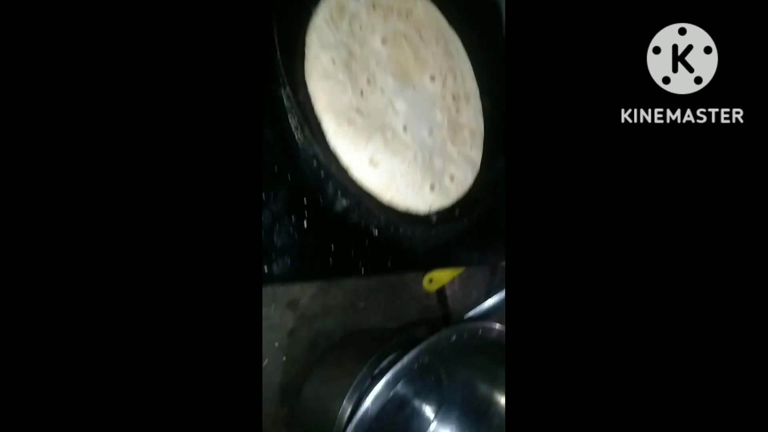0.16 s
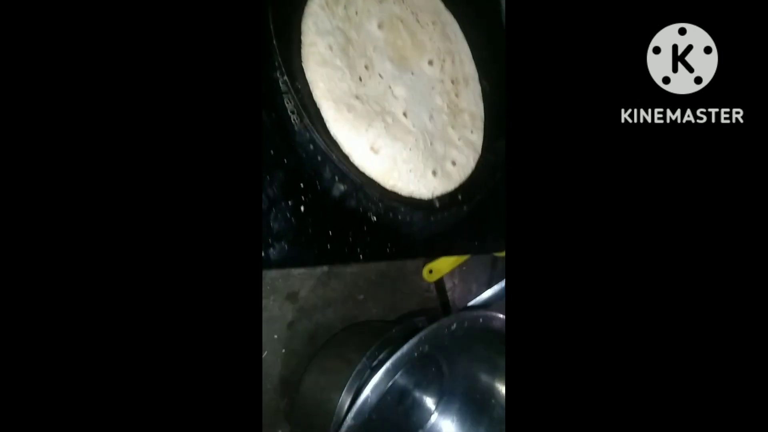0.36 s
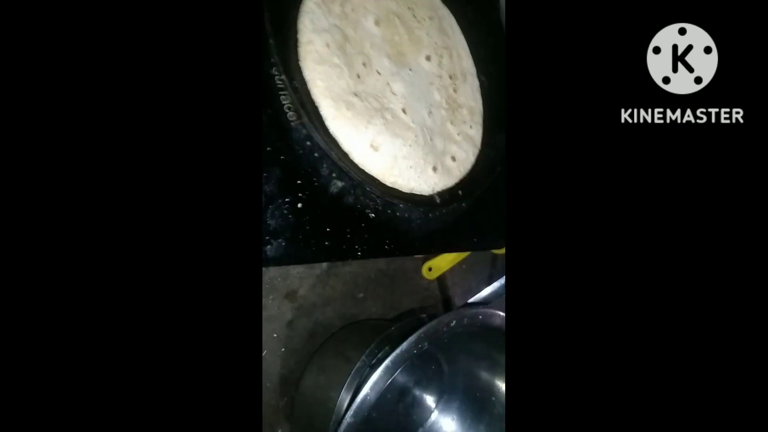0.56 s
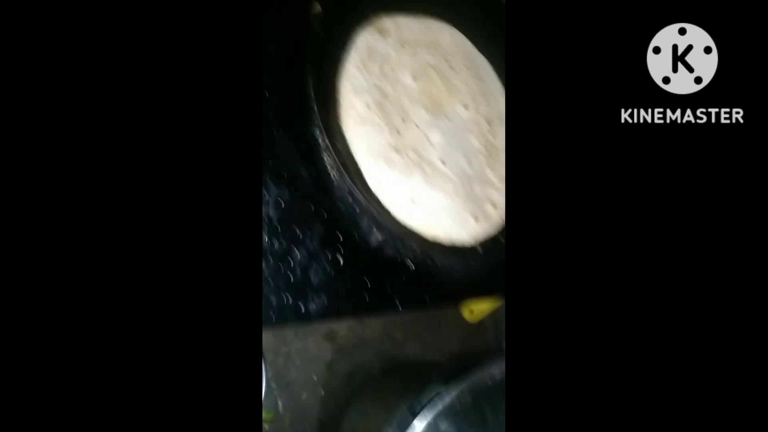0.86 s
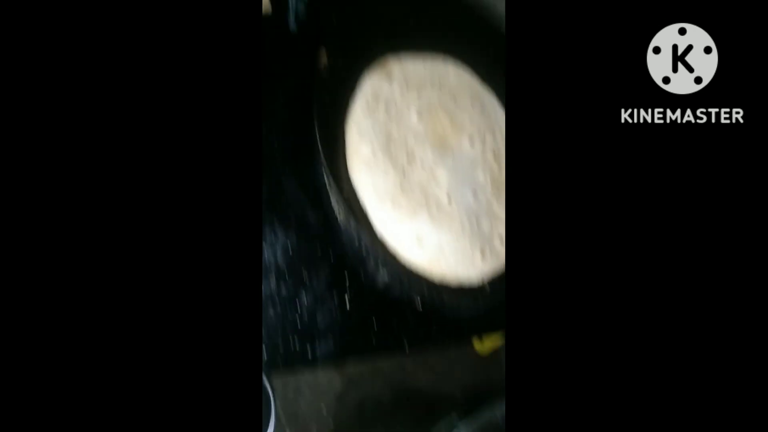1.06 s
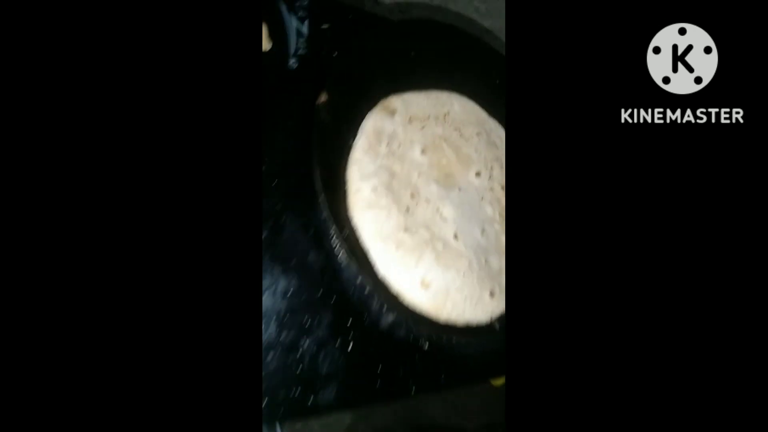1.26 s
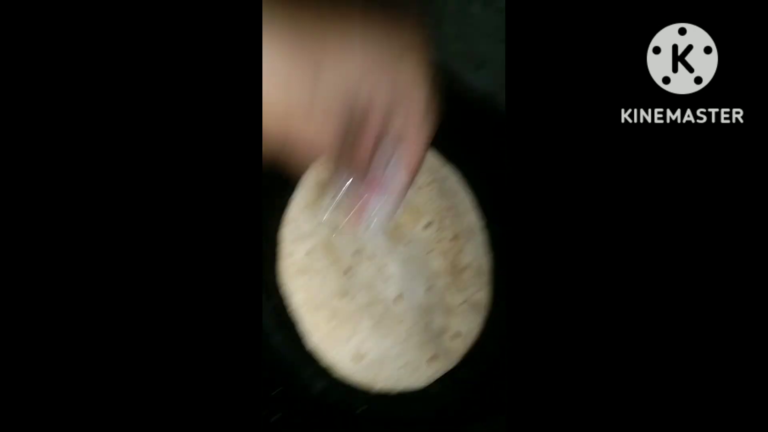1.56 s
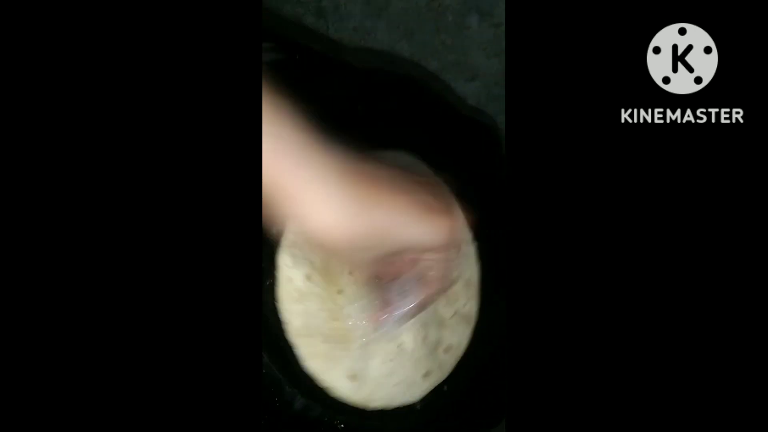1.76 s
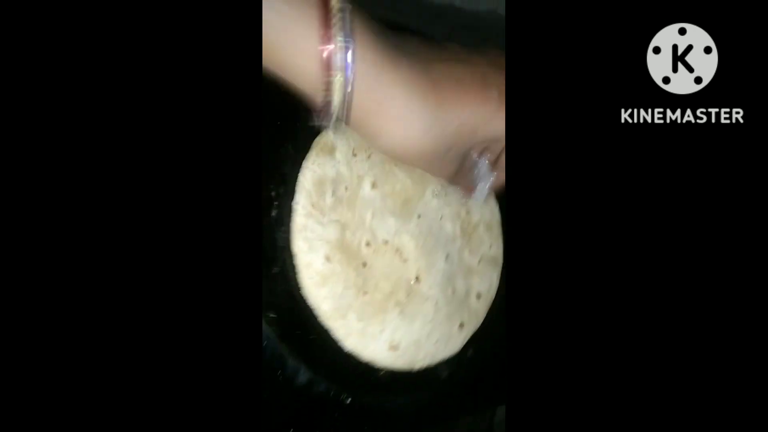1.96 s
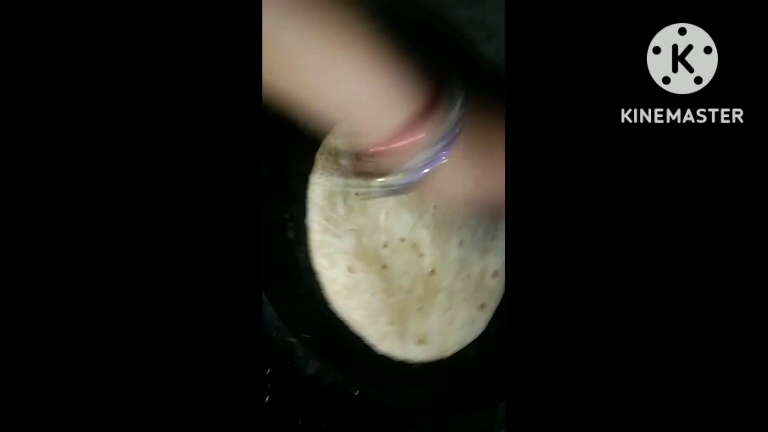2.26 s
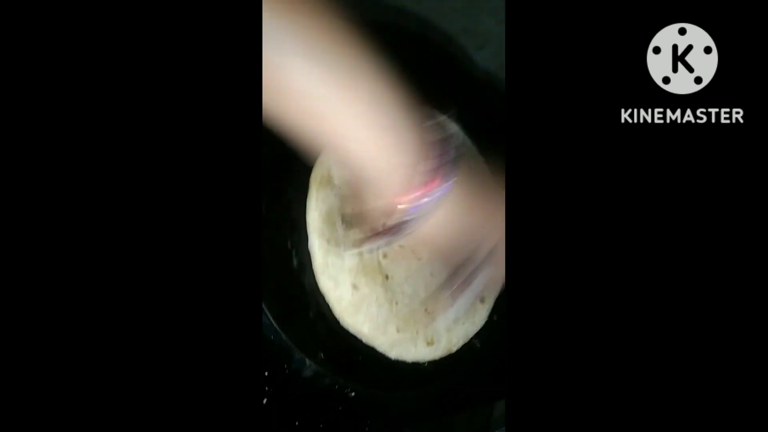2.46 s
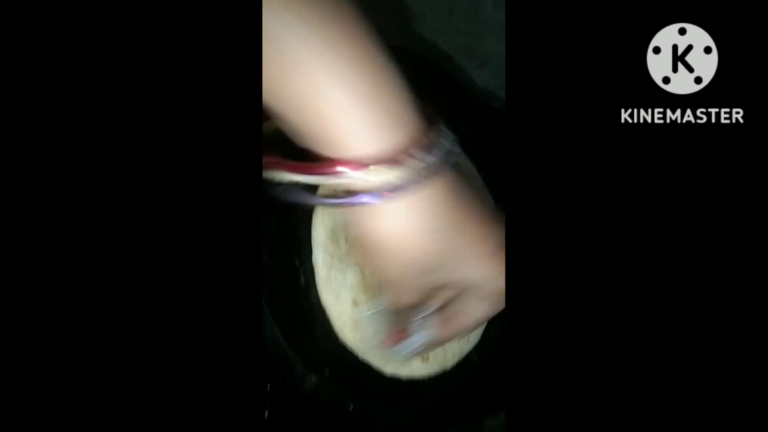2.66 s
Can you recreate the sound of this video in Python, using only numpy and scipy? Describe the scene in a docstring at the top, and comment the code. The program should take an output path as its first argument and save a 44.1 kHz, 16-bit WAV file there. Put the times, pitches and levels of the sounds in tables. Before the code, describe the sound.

Thin bangles jingle close to the microphone in a small hard-walled kitchen; first a bright cluster of clinks, then softer ones among hissing wipes of oil on flatbread, dry ticks, low booms and faint bubbling.

```python
"""Faint kitchen air, a thin fluttering trill and soft bubbling open, then bangles clink on a wrist, close to the microphone.
A hand wipes oil over flatbread on a hot griddle, among dry ticks, low booms and two faint whistles, one short and one long;
hard walls ring around it. Bangles are sums of decaying, unsteady partials; wipes are hissing and crackling noise with a
resonant rub. Bubbles are short sine blips; booms, ticks, trill, whistles and air are shaped noise."""
import sys
import numpy as np
from scipy import signal
from scipy.fft import rfft, irfft, next_fast_len
from scipy.io import wavfile
from scipy.ndimage import uniform_filter1d, map_coordinates

SR = 44100
rng = np.random.default_rng(int(sys.argv[2]) if len(sys.argv) > 2 else 0)


def unload_audio(sound):
    """Save the sound as a 16-bit wav file, at the path given as the first command line argument."""
    columns = np.transpose(np.atleast_2d(sound))
    # keep every value between -1 and 1, then stretch to whole-number steps
    steps = np.round(np.clip(columns, -1, 1) * 32767)
    wavfile.write(sys.argv[1], SR, steps.astype(np.int16))


N = 123479  # samples, 2.8 s


def undb(db):
    """Decibels to an amplitude factor."""
    return 10 ** (np.asarray(db) / 20)


def unit(x):
    """Scale to rms 1."""
    return x / np.sqrt(np.mean(x ** 2) + 1e-30)


def since(start):
    """Seconds since a moment, zero before it."""
    return np.maximum(np.arange(N) / SR - start, 0)


def walk(rate):
    """Random steps, rate per second, smoothed twice and scaled to rms 1."""
    k = max(int(SR / rate), 2)
    steps = np.repeat(rng.standard_normal(N // k + 1), k)
    smooth = uniform_filter1d(uniform_filter1d(steps, k), k)
    return unit(smooth[:N])


def colour(x, points, tilt=0):
    """Give a sound a spectrum of (Hz, dB) points, tilted by dB per octave, at rms 1."""
    size = next_fast_len(N, True)
    octave = np.log2(np.fft.rfftfreq(size, 1 / SR) + 1)
    hz, db = np.array(points).T
    gain = undb(np.interp(octave, np.log2(hz), db) + tilt * octave)
    return unit(irfft(rfft(x, size) * gain, size)[:N])


def band(hz, width):
    """Noise through one resonance, at rms 1."""
    size = next_fast_len(N)
    f = np.fft.rfftfreq(size, 1 / SR)
    resonance = 1 / (1 + ((f - hz) / (width / 2)) ** 2 / 2) ** 2
    return unit(irfft(rfft(rng.standard_normal(size)) * resonance, size)[:N])


def swell(start, rise, hold, fall):
    """Rise, hold, then a fall in dB per second."""
    attack = np.minimum(since(start) / max(rise, 1e-3), 1) ** 1.42
    return attack * undb(-fall * since(start + rise + hold))


def pops(rate, spread_db):
    """Random one-sample impulses of either sign and uneven size, rate per second."""
    hits = rng.random(N) < rate / SR
    sign = rng.choice([-1, 1], N)
    return hits * sign * undb(spread_db * np.minimum(rng.exponential(size=N), 4))


def room(x, wet_db):
    """Add the dense tail of the kitchen walls: decaying noise after a short gap."""
    gap_s, t60_s = 0.0026, 0.24
    t = since(gap_s)[:SR]
    tail = rng.standard_normal(SR) * (t > 0) * undb(-60 * t / t60_s)
    tail = tail / np.sqrt(np.sum(tail ** 2))
    return x + undb(wet_db) * signal.fftconvolve(x, tail)[:N]


def kitchen_air():
    """Broad room noise whose level wavers."""
    # Spectrum of the air. Each row: Hz, dB per Hz.
    air_colour = [(20, -45), (50, -38), (75, -4.5), (190, 2.5), (260, -3), (700, -10), (930, -7),
                  (2500, -13.5), (3600, -24.5), (8500, -26.5), (12000, -8.5), (15500, -18.5)]
    return undb(-61) * colour(rng.standard_normal(N), air_colour) * undb(1.8 * walk(14))


def spitting():
    """Fine spitting of the griddle: sparse impulses, mostly treble."""
    spit_colour = [(3000, -30), (8500, -16), (12000, 0), (15500, -2)]  # Hz, dB per Hz
    return undb(-71) * colour(pops(82, 3), spit_colour)


def simmering():
    """Resonances of the smaller bubbles, as noise bands of wavering level."""
    # Each row: centre in Hz, width in Hz, level in dB before the wavering.
    simmer_bands = [(936, 203, -67.5), (1580, 320, -80.5)]
    return sum(band(hz, width) * undb(db + 2 * walk(20)) for hz, width, db in simmer_bands)


def trill():
    """A thin high trill: narrow noise bands that flutter quickly under a slower change of level."""
    # Each row: centre in Hz, width in Hz, level in dB before the flutter and the slower change.
    trill_bands = [(6774, 270, -64), (7050, 100, -65.5)]
    # Slower change of level. Each row: time in seconds, gain in dB.
    trill_level = [(0, 4), (.6, -2), (.98, -2), (1.081, 3), (1.15, -2), (1.55, 4), (1.72, -4.5)]
    flutter_db, flutter_per_s = 5, 55
    thin = sum(band(hz, width) * undb(db + flutter_db * walk(flutter_per_s)) for hz, width, db in trill_bands)
    return thin * undb(np.interp(np.arange(N) / SR, *np.array(trill_level).T))


def booms():
    """Low booms of noise, levelled over short stretches, that swell and die away."""
    # Each row: start in seconds, level in dB, fall in dB per second.
    boom_times = [(-.03, -56, 143), (.955, -67.5, 160), (1.22, -37, 97), (1.33, -51, 22.5),
                  (1.929, -42.5, 33), (2.0, -53.5, 51)]
    # Spectrum before the levelling. Each row: Hz, dB per Hz.
    boom_colour = [(20, -25), (50, -16.5), (64, -10), (76, 4.5), (92, -5), (120, -10), (190, -14.5),
                   (260, -45), (600, -62)]
    rise_s, hold_s, end_s = 0.021, 0.014, 2.37
    rumble = colour(rng.standard_normal(N), boom_colour)
    rumble = rumble / np.sqrt(uniform_filter1d(rumble ** 2, size=2500))
    level = sum(undb(db) * swell(start, rise_s, hold_s, fall) for start, db, fall in boom_times)
    return rumble * level * undb(-200 * since(end_s))  # what is left drops away quickly


def rattle():
    """Unsteady strength and phase of a partial while the bangles chafe against each other."""
    smoothing = int(SR / 180)  # samples
    shake = uniform_filter1d(rng.standard_normal((2, SR // 2)), size=smoothing)
    shake = uniform_filter1d(shake, size=40)
    return unit(shake[0]) + 1j * unit(shake[1])


def ringing(which, t, low_db, high_db, ring):
    """The partials of one bangle, weighted by where it is struck and unsteady from chafing."""
    # Partials of the four bangles. Each row: the frequencies of one bangle in Hz.
    partial_hz = [
        [4332, 5280, 6890, 8285, 9445, 15170],
        [4888, 4960, 6745, 8226, 10243, 13225],
        [5100, 5160, 6015, 7125, 9830, 9897, 11409, 13310],
        [3758, 4600, 5276, 5739, 6557, 6966, 8651, 9345],
    ]
    # How they ring, one row per bangle. Each pair: level in dB, free ring time t60 in seconds.
    partial_modes = [
        [(-31, 0.31), (-25.5, 0.2), (-47, 0.31), (-20.5, 0.15), (0.5, 0.16), (-4.5, 0.12)],
        [(-27.5, 0.38), (-20, 0.16), (-38, 0.31), (-18, 0.2), (2.5, 0.13), (-2.5, .06)],
        [(-27.5, .35), (-25, 0.32), (-27, 0.099), (-42, 0.46), (-3, 0.19), (-5.5, 0.2), (-10, 0.061),
         (3.5, 0.056)],
        [(-17, 0.25), (-2, 0.23), (-8, 0.17), (-15.5, 0.18), (-4.5, 0.21), (-3, 0.12), (-14, 0.28),
         (-9.5, 0.17)],
    ]
    rattle_share, detune_hz = 0.53, 11.6  # detune_hz is the spread of the random detuning
    out, shake = 0, rattle()
    for hz, (mode_db, t60) in zip(partial_hz[which], partial_modes[which]):
        place_db = low_db * (hz < 9000) + high_db * (hz > 12000)
        gain = undb(mode_db + place_db - 60 * t / (t60 * max(ring, .1)))
        cycles = (hz + detune_hz * rng.normal()) * t + rng.random()
        tone = np.exp(2j * np.pi * cycles)
        unsteady = 1 + rattle_share * np.roll(shake, rng.integers(SR))[:len(t)]
        out = out + gain * np.real(unit(unsteady) * tone)
    return out


def bangles():
    """Each contact clicks, chatters and sets three bangles ringing in its own mix; the fourth is only nudged."""
    # Clinks. Each row: start in seconds, first, second and third bangle in dB, partials under 9 kHz in dB,
    # partials over 12 kHz in dB, contact click in dB, share of the free ring time.
    clink_rows = [(.2399, -32, -28, -32.5, 7, -1, -29, 0.79), (.242, -25.5, -23.5, -46, -2, -1, -32, 0.84),
                  (.263, -29.5, -36, -49, 10, -14, -39, 0.74),
                  (.311, -31.5, -37.5, -31, 18.5, 3, -30, 0.58),
                  (.3143, -32, -28.5, -23.5, -1, -13, -19.5, 0.92), (.32, -37, -33.5, -32, 15, 1, -25, 1.1),
                  (.424, -55, -61, -52, 18, -16, -36, 1.6), (.8305, -48, -45, -73, -1, 1.5, -64, 2.1),
                  (.8905, -40, -40, -35.5, 2, 2, -48, 0.76), (.909, -55, -52.5, -46.5, 15.5, -2, -64, 1.43),
                  (1.3671, -36, -45, -37, 1, -7, -52, 0.69), (1.415, -35, -36.5, -53, 10, -3, -54, 1.1),
                  (1.4245, -34, -33.5, -32.5, 8, -7, -29, 0.42),
                  (1.5315, -36.5, -37.5, -67, 0, 2, -53, 0.53),
                  (1.573, -39.5, -44, -41, -12, -3, -41, 0.61),
                  (1.587, -34.5, -40, -51, -4, -10, -38, 0.85), (1.649, -33, -45, -53, 0, -12, -37, 0.16),
                  (1.8452, -27, -40, -60, 4.5, -10, -43, 0.43), (2.085, -40, -50, -48, 1, -15, -50, 1.1),
                  (2.131, -47, -32, -42, -5, -9, -52, 1.3), (2.4575, -16.5, -18.5, -24.5, 6, -1, -31, 0.31),
                  (2.4951, -30.5, -31.5, -31, 11, -20, -45, 0.71), (2.514, -31, -39, -45, 7, 2, -23, .37)]
    # Soft nudges of the fourth bangle. Each row: start in seconds, level in dB, share of the free ring time.
    nudge_rows = [(0, -58.5, 0.76), (.163, -56, 0.79), (1.648, -47.5, 0.69), (2.772, -46.5, 0.87)]
    # Spectrum of a contact. Each row: Hz, dB per Hz.
    contact_colour = [(2500, -64), (3800, -34), (5000, -0.5), (8000, 1.5), (10000, -1), (13000, -4),
                      (15500, 8.5)]
    click_s, contact_s, nudge_s = 0.0022, 0.0015, 0.0021  # click decay, then the two onset times
    chatter_db, chatter_s = -19.5, 0.047  # level against the click, decay
    out = np.zeros(N)
    click = colour(rng.standard_normal(N), contact_colour)
    chatter = colour(pops(1600, 4.7), contact_colour)
    for start, first_db, second_db, third_db, low_db, high_db, click_db, ring in clink_rows:
        span = slice(int(start * SR), int(start * SR) + SR // 2)
        t = since(start)[span]
        contact = click[span] * np.exp(-t / click_s)
        contact = contact + undb(chatter_db) * chatter[span] * np.exp(-t / chatter_s)
        sound = undb(click_db) * contact
        for which, db in enumerate((first_db, second_db, third_db)):
            sound = sound + undb(db) * ringing(which, t, low_db, high_db, ring)
        out[span] += sound * np.minimum(t / contact_s, 1)
    for start, db, ring in nudge_rows:
        first = max(int(start * SR), 0)
        t = np.arange(min(SR // 2, N - first)) / SR
        out[first:first + len(t)] += undb(db) * ringing(-1, t, 0, 0, ring) * np.minimum(t / nudge_s, 1)
    return out


def bubbles():
    """Soft round blips of a pot and of the oil: sines that swell and fade in a few milliseconds."""
    # Each row: start in seconds, pitch in Hz, peak level in dB.
    bubble_rows = [(.104, 923, -45.5), (.168, 1490, -55), (.27, 1596, -54), (.365, 1000, -50.5),
                   (.395, 1490, -50.5), (.485, 926, -50), (.505, 1595, -57), (.765, 942, -47),
                   (.793, 913, -48), (.968, 602, -52.5), (1.143, 957, -49.5), (1.23, 874, -44),
                   (1.238, 2384, -43.5), (1.252, 2368, -44.5), (1.274, 2403, -45), (1.46, 883, -52),
                   (2.48, 930, -51.5)]
    peak_s = 0.0048  # time from start to peak
    out = np.zeros(N)
    for start, hz, db in bubble_rows:
        t = since(start)
        out += undb(db) * t / peak_s * np.exp(1 - t / peak_s) * np.sin(2 * np.pi * hz * t)
    return out


def flickering(x, depth_db, rate):
    """The level flickers by chance from one short frame to the next, nearly alike at all pitches."""
    f, t, cells = signal.stft(x, nperseg=1024)  # f in cycles per sample, t in samples
    place = np.meshgrid(14 * np.log2(1 + f / 1000), t * rate, indexing="ij")  # where to read the chance map
    gain = undb(depth_db * map_coordinates(rng.standard_normal((72, 256)), place, mode="mirror"))
    return unit(signal.istft(cells * gain)[1][:N])


def wipes():
    """Oil hisses and crackles under the hand; at full pressure a scratchy rub with wavering resonances joins in."""
    # Wipes of the hand. Each row: start in seconds, rise in seconds, hold in seconds, fall in dB per second,
    # hiss in dB, coarse rub in dB, tilt of the hiss in dB per octave.
    wipe_rows = [(0.491, 0.0071, 0.016, 169, -44.5, -92, 10), (1.194, 0.035, 0.021, 163, -35, -55.5, 1),
                 (1.768, 0.026, 0.07, 107, -42.5, -66, 7.5), (1.87, 0.074, 0.07, 220, -33, -34.5, 0),
                 (2.088, 0.018, 0.035, 99, -33.5, -44.5, -4), (2.282, 0.062, 0.014, 121, -30.5, -42, -4),
                 (2.485, 0.081, 0.025, 117, -35.5, -43, -3), (2.77, 0.0055, .03, 108, -51, -95, 3)]
    # Spectrum of the hiss before its tilt. Each row: Hz, dB per Hz.
    hiss_colour = [(1200, -43), (2400, -30), (3200, -11.5), (4500, -3), (6600, 3), (8500, -4),
                   (11000, -6.5), (13500, -7), (15500, -12.5)]
    # Spectrum of the gritty part of the rub. Each row: Hz, dB per Hz.
    rub_colour = [(700, -59), (1200, -35), (1550, 0), (1900, 0), (2400, -1), (3200, -2), (4500, 0),
                  (8000, -19.5)]
    # Resonances of the rub. Each row: centre in Hz, width in Hz, level in dB before the wandering.
    rub_bands = [(1501, 157, -11), (1892, 117, -6), (2262, 64, -5), (2522, 136, -10.5), (3220, 170, -5.5)]
    rub_lag_s, rub_rise_s, rub_hold_s, rub_fall_db_s = -0.0086, 0.036, 0.049, 182
    crackle_per_s, wander_db = 2500, 4.5
    crackle = undb(-13.5) * unit(pops(crackle_per_s, 1))
    scratch = undb(-8.5) * unit(pops(520, 3.8))
    fizz = flickering(rng.standard_normal(N) + crackle + scratch, depth_db=1.5, rate=26)
    grit = undb(-1.5) * colour(flickering(pops(crackle_per_s, 1.5), depth_db=4.5, rate=20), rub_colour)
    hollow = sum(band(hz, width) * undb(db + wander_db * (walk(18) - 2.5)) for hz, width, db in rub_bands)
    hiss, rub = np.zeros(N), np.zeros(N)
    for start, rise, hold, fall, hiss_db, rub_db, tilt in wipe_rows:
        hiss += undb(hiss_db) * swell(start, rise, hold, fall) * colour(fizz, hiss_colour, tilt)
        rub_start = start + rise + rub_lag_s - rub_rise_s / 2
        rub += undb(rub_db) * swell(rub_start, rub_rise_s, rub_hold_s, rub_fall_db_s)
    return hiss + rub * (grit + hollow)


def ticks():
    """Short dry clicks of nails and spitting oil: decaying noise bands with no ring."""
    # Each row: start in seconds, level in dB, centre in Hz, decay time in seconds.
    tick_rows = [(.4915, -41, 9700, 0.0038), (.7194, -49, 12000, .001), (1.406, -35, 6340, 0.0024),
                 (1.4232, -30, 6540, 0.0022), (1.461, -39, 5900, .0025), (1.729, -39.5, 11640, .0013),
                 (1.783, -43, 7200, 0.0049), (2.102, -26.5, 7530, 0.0012), (2.515, -29, 6360, 0.002),
                 (2.557, -32, 7000, 0.0017)]
    out = np.zeros(N)
    for start, db, hz, decay_s in tick_rows:
        t = since(start)
        out += undb(db) * band(hz, hz * 0.13) * (t > 0) * np.exp(-t / decay_s)
    return out


def whistles():
    """Two faint whistles, one short and one long: narrow noise bands that swell, waver and fall."""
    # Each row: start in seconds, rise in seconds, hold in seconds, fall in dB per second,
    # centre in Hz, width in Hz, level in dB before the wavering.
    whistle_rows = [(1.652, 0.053, 0.14, 150, 1098, 50, -53), (1.705, 0.072, 0.9, 123, 1884, 127, -55.5)]
    out = np.zeros(N)
    for start, rise, hold, fall, hz, width, db in whistle_rows:
        out += undb(db) * swell(start, rise, hold, fall) * band(hz, width) * undb(1.6 * walk(16.35))
    return out


def scene():
    """Clinks, ticks and bubbles excite the walls most, wipes less; the rest stays dry."""
    background = kitchen_air() + spitting() + simmering() + trill() + whistles()
    small_sounds = room(bangles() + ticks() + bubbles(), wet_db=-7)
    return (small_sounds + room(wipes(), wet_db=-13) + booms() + background)[None]


def record(dry):
    """The recorder cuts the top with a steep low-pass at 15.4 kHz."""
    return signal.sosfilt(signal.ellip(10, .2, 70, 15400, fs=SR, output="sos"), dry)


dry = scene()
out = record(dry)
unload_audio(out)
```